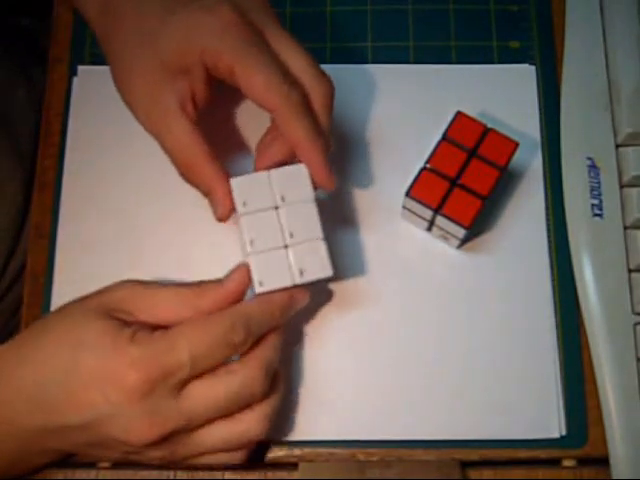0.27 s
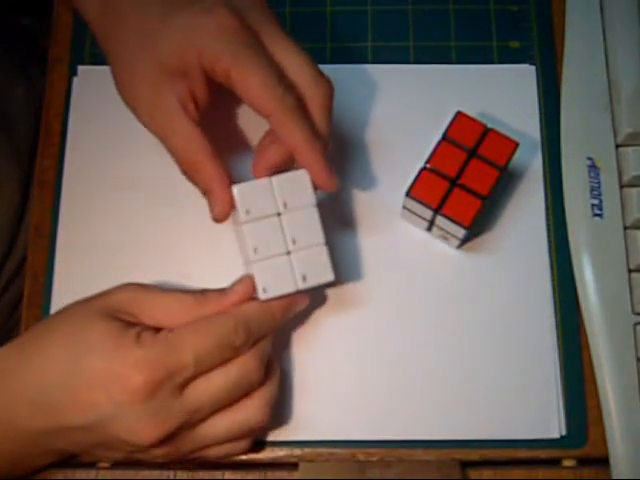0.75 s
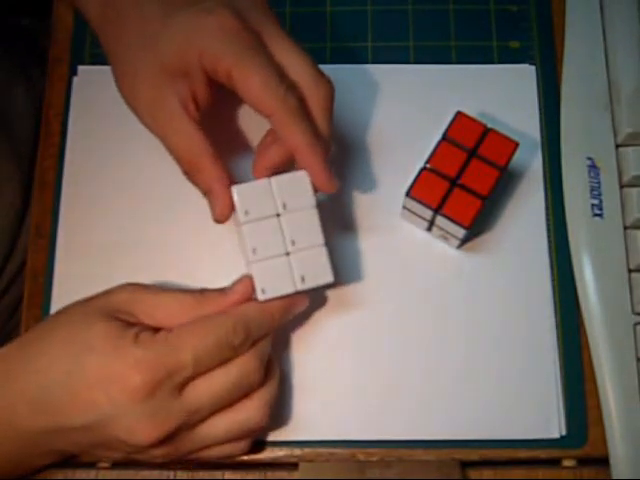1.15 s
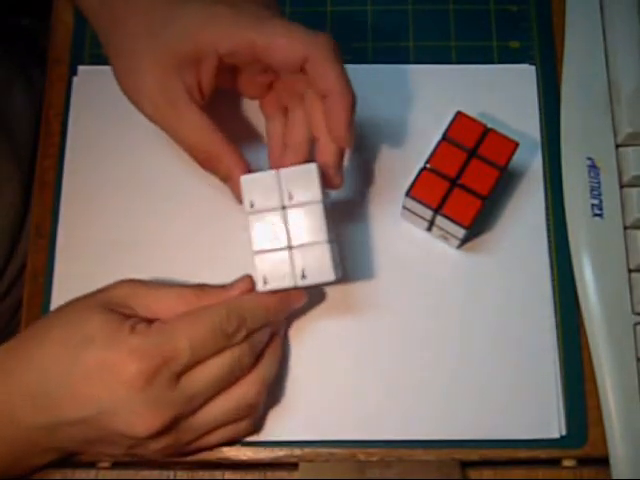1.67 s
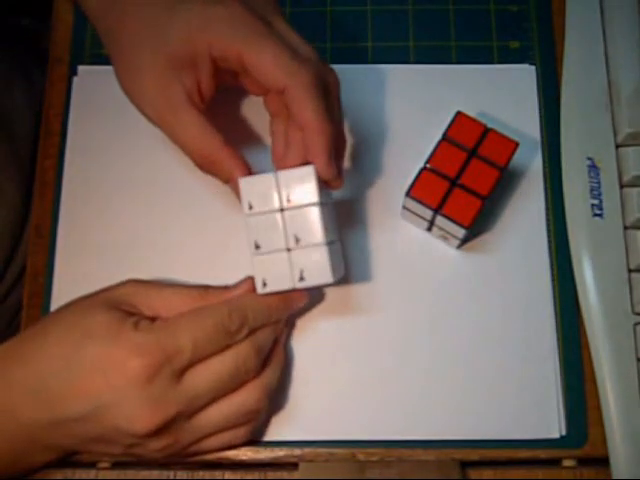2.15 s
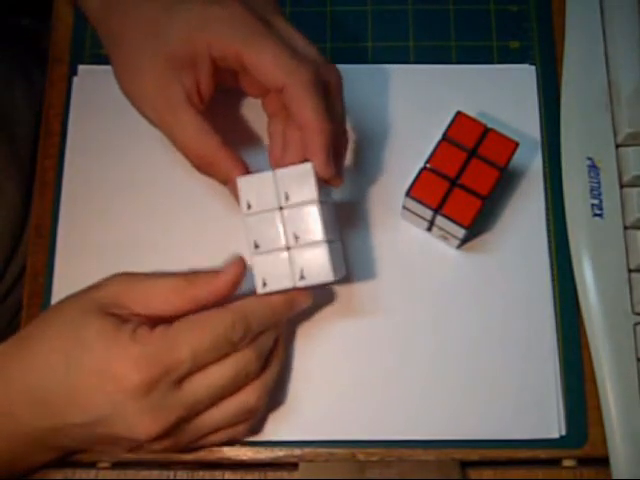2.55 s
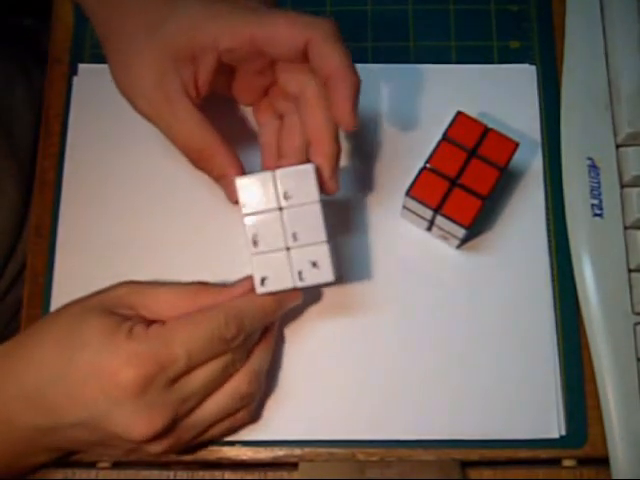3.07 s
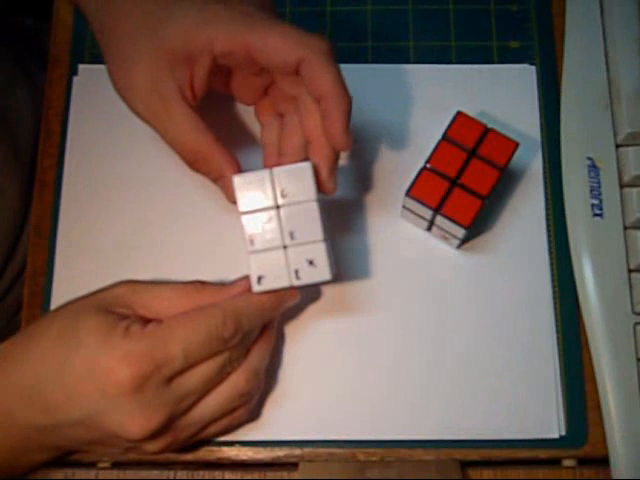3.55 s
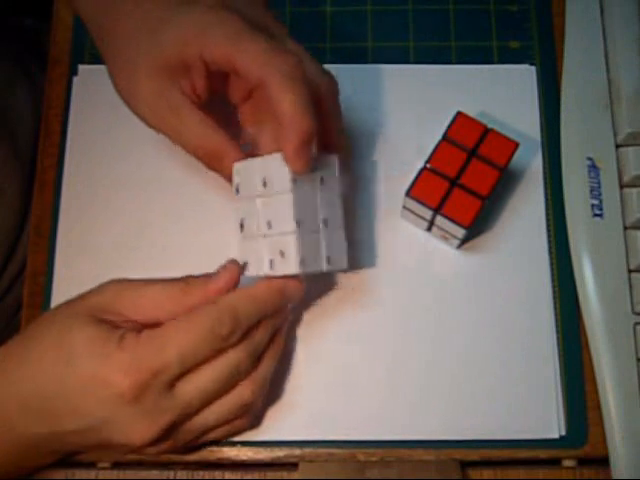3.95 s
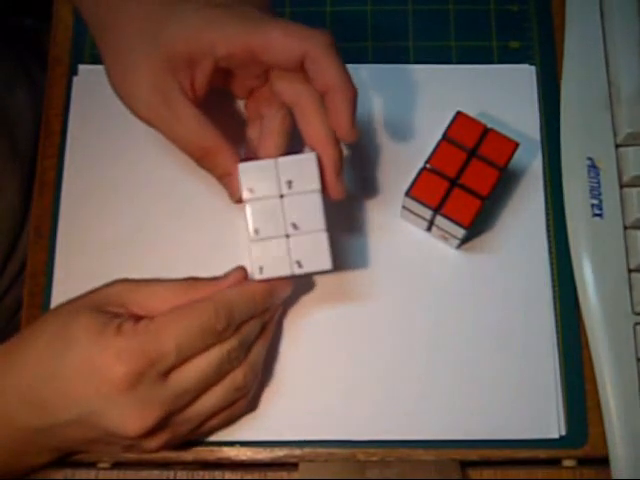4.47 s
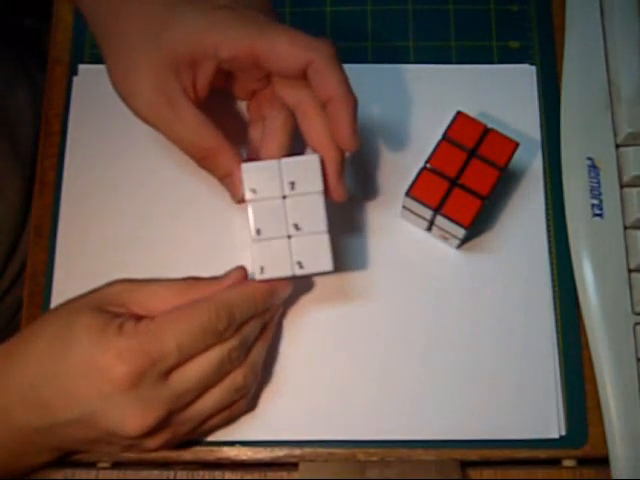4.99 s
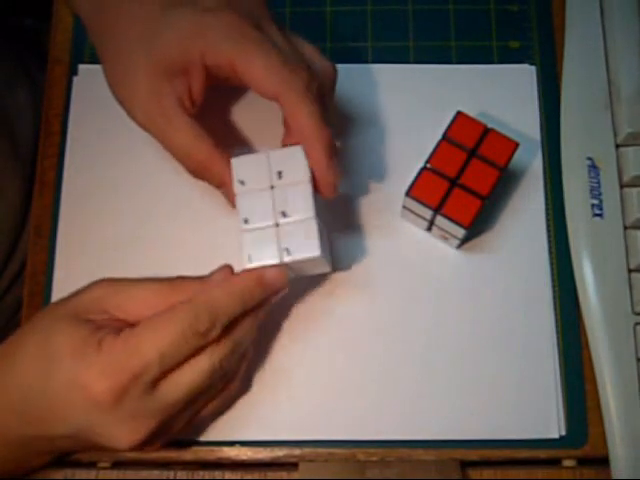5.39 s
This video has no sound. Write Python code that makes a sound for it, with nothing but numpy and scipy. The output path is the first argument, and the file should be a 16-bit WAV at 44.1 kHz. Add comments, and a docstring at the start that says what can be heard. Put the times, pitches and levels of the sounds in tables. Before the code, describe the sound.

In a small quiet room, a desk microphone picks up a continuous computer drone of midrange fan whine, deep hum and breathy airflow. Hands turn a small plastic puzzle: one crisp crackling click at about 1.2 seconds, a soft knock and brief dry rubbing, then a barely audible tap. Later turns are only faint slides, with subdued low desk rumble beneath. Light hiss persists to the end.

```python
"""From the start a computer drones: fan blade tones over mains and spindle hum, and noise shaped as air.
Near 1.2 s a plastic puzzle cube snaps and knocks, as filtered sums of decaying modes and noise bursts.
Soft slides of grainy noise follow, with one more knock near 1.8 s and fainter slides after 2.6 s.
Desk rumble swells near 2.7 s and 4.3 s as the hands shift their weight.
Throughout, a band-limited microphone adds hiss and faint thin tones."""
import sys
import numpy as np
from scipy import signal
from scipy.fft import rfft, irfft, next_fast_len
from scipy.io import wavfile
from scipy.ndimage import map_coordinates

SR = 44100
rng = np.random.default_rng(int(sys.argv[2]) if len(sys.argv) > 2 else 0)


def log_audio(samples):
    """Write samples as a 16-bit WAV file to the path given in sys.argv[1]."""
    # one column per channel
    frames = np.atleast_2d(samples).T
    # limit to full scale, then quantise
    limited = np.clip(frames, -1, 1)
    pcm = np.round(limited * 32767).astype(np.int16)
    wavfile.write(sys.argv[1], SR, pcm)


N = 248180  # samples

# contacts of the cube: [onset t/s, peak level/dB, centre of excited band f/Hz, bandwidth/octaves]
CONTACTS = [(1.1663, -27.5, 3800, .8), (1.1705, -24, 3850, .8), (1.1724, -24, 3900, .7),
            (1.1736, -22.5, 3850, .7), (1.1777, -16.5, 2500, 2.5), (1.1799, -20.5, 2600, 1.7),
            (1.2331, -24, 1250, .6), (1.2588, -34, 1500, .6), (1.7783, -34, 2100, .5)]
# modes of the plastic cube: [f/Hz, mean relative level/dB, 60 dB decay time t/s]
PLASTIC_MODES = [(1220, -8, 0.019), (1630, 2, .016), (2080, 6, 0.021), (2630, 7, 0.0053), (3030, -3, 0.011),
                 (3710, 1.5, 0.0075), (4190, -5.5, 0.0081), (4960, -14, 0.0088), (5770, -11, 0.0063),
                 (11400, 12, 0.0025)]
# sliding layers: [centre t/s, length t/s, level/dB]
SLIDES = [(1.247, 0.19, -46.5), (1.483, 0.23, -46), (2.65, 0.23, -61), (3.74, .16, -51)]
# spectrum of sliding plastic: [f/Hz, relative level/dB]
SCRAPE_SPECTRUM = [(500, -27), (1150, 1.5), (1330, -12), (1550, 4), (1950, -8), (2800, -6), (3050, -3.5),
                   (3900, -19), (4700, -14), (7000, -23), (15000, -50)]

# harmonics 1, 2, .. of the blade-pass rate: [steady level/dB, level of the fluttering part/dB]
BLADE_TONES = [(-32.5, -59), (-45.5, -55), (-51.5, -58.5), (-46, -60.5), (-60, -64), (-61.5, -76),
               (-73.5, -70), (-80, -79)]
# rotor unbalance at the shaft rate, its double and just above the blade tone: [shaft multiple, level/dB]
UNBALANCE = [(1, -57), (2, -60.5), (8, -57.5)]
BLADES = 7
BLADE_HZ, CREEP_HZ_PER_S = 522.55, 0.29  # blade-pass rate at the start, before unsteadiness; its drift
WANDER_HZ, JITTER_HZ = 0.18, 0.079  # slow and quick unsteadiness of the blade-pass rate

# mains and disk spindle hum, before the slow rise: [f/Hz, level/dB]
HUM = [(50, -40), (100, -59), (120.05, -39.5), (200, -57)]
HUM_START_DB, HUM_RISE_DB_PER_S = -1.3, 0.4
# air rushing through the case, before resonance and unsteadiness: [f/Hz, level/dB per Hz]
AIR_SPECTRUM = [(40, -64), (110, -68), (200, -70.5), (370, -76.5), (600, -72.5), (900, -76.5), (1400, -80),
                (2000, -79.5), (2300, -81), (3200, -84.5), (4000, -90.5), (4600, -90), (7000, -100.5),
                (12000, -115)]
# resonances of the case: [f/Hz, full width at half the dB lift f/Hz, lift level/dB]
CASE_RESONANCES = [(301, 31, 3), (449, 11, 6.5), (634, 42, 1.5), (730, 56, 5), (1010, 35, 10),
                   (1143, 66, 5), (1200, 22, 2), (1330, 40, 5.5), (1510, 57, 5), (1666, 19, 7.5),
                   (1800, 71, 4), (2005, 41, 4.5), (2476, 86, 3.5), (3470, 240, 1)]

# rumble of the desk, before its changes of level: [f/Hz, level/dB per Hz]
RUMBLE_SPECTRUM = [(3, -85), (8, -58), (13, -52), (19, -51.5), (28, -58.5), (40, -61), (60, -61.5),
                   (85, -71), (160, -85), (500, -120)]
# hands shifting their weight on the desk: [centre t/s, length t/s, level over the resting rumble/dB]
LEANS = [(2.68, 0.36, 8), (4.3, 0.15, 0)]
REST_DB, RESTLESS_DB = -0.7, 2.5  # gain of the rumble and the scale of its random swing

# microphone hiss: [f/Hz, level/dB per Hz]
HISS_SPECTRUM = [(1000, -100), (8000, -99.5), (11000, -99.2), (15500, -97)]
# thin steady tones of the electronics: [f/Hz, level/dB]
WHISTLES = [(4339, -76), (4859, -71), (5382, -76), (5907, -69), (6429, -76.5), (7278, -80), (7477, -81),
            (8323, -79), (8523, -77), (10007, -78), (10094, -79), (11577, -74.5), (12623, -74),
            (13905, -79), (14193, -78.5), (14955, -80), (15477, -72)]
TOP_HZ = 15750  # band limit of the microphone


def clicks():
    """Modal excitation: the band of each contact selects which damped modes of the cube ring."""
    out = np.zeros(N)
    t = np.arange(SR // 10) / SR
    for onset_s, peak_db, centre_hz, octaves in CONTACTS:
        ring = 0
        for hz, level_db, t60 in PLASTIC_MODES:
            mode_db = level_db + rng.normal(0, 3.0)
            ring = ring + amp(mode_db - 60 * t / t60) * np.sin(2 * np.pi * hz * t)
        crack = 0.47 * amp(-60 * t / 0.0069) * rng.standard_normal(len(t))

        half_band = 2 ** (octaves / 2)
        edges = [centre_hz / half_band, min(centre_hz * half_band, SR / 3)]
        band = signal.butter(2, edges, "bandpass", fs=SR, output="sos")
        hit = signal.sosfilt(band, ring + crack)
        out[round(onset_s * SR):][:len(t)] += amp(peak_db) * hit / np.abs(hit).max()
    return out


def slides():
    """Sliding friction: plastic faces rub with a fine random grain while a layer turns."""
    grain = rng.standard_normal(N) * amp(4.0 * wobble(220))
    scrape = filtered(grain, lambda hz: amp(along(SCRAPE_SPECTRUM, hz)))
    return swells(SLIDES) * unit(scrape)


def room(x, t60, wet_db):
    """Reverberation: a small room adds a short tail of exponentially decaying noise."""
    t = np.arange(SR // 3) / SR
    tail = rng.standard_normal(len(t)) * amp(-60 * t / t60)
    tail /= np.linalg.norm(tail)
    return x + amp(wet_db) * signal.fftconvolve(x, tail)[:N]


def fan():
    """Blade-pass radiation: tones lock to the shaft angle and uneven inflow makes each harmonic flutter."""
    t = np.arange(N) / SR
    unsteadiness = WANDER_HZ * wobble(1.99) + JITTER_HZ * wobble(14)
    blade_hz = BLADE_HZ + CREEP_HZ_PER_S * t + unsteadiness
    turns = np.cumsum(blade_hz) / BLADES / SR  # shaft angle in revolutions

    def spin(order):
        """Phase locking: a complex tone at a multiple of the shaft rate, its real part at rms 1."""
        return np.sqrt(2) * np.exp(2j * np.pi * (order * turns + rng.random()))

    whine = sum(amp(db) * spin(round(order)) for order, db in UNBALANCE)
    for k, (steady_db, flutter_db) in enumerate(BLADE_TONES, 1):
        gain = amp(steady_db) + amp(flutter_db) * flutter(width_hz=12.0)
        whine += gain * spin(k * BLADES)
    return whine.real


def hum():
    """Periodic excitation: mains and disk spindle drone as steady sines whose level rises slowly."""
    t = np.arange(N) / SR
    return tones(HUM) * amp(HUM_START_DB + HUM_RISE_DB_PER_S * t)


def air():
    """Flow noise and resonance: the fan's gently unsteady draught is coloured by the hollow case."""
    def density_db(hz):
        """Resonance: each peak of the case lifts the flow spectrum about its centre."""
        lift = sum(db / (1 + (2 * (hz - centre) / width) ** 2) for centre, width, db in CASE_RESONANCES)
        return along(AIR_SPECTRUM, hz) + lift

    return noise(density_db) * amp(0.33 + 0.25 * wobble(5.6))


def desk():
    """Structure-borne sound: deep rumble reaches the microphone stand and swells as the hands shift."""
    # the leans add in power to the resting rumble
    pressure = np.hypot(1, swells(LEANS)) * amp(REST_DB + RESTLESS_DB * wobble(3))
    return noise(lambda hz: along(RUMBLE_SPECTRUM, hz)) * pressure


def amp(db):
    """Logarithmic level: decibels to amplitude gain."""
    return 10 ** (np.asarray(db) / 20)


def unit(x):
    """Normalization: x at rms 1."""
    return x / np.sqrt(np.mean(np.abs(x) ** 2) + 1e-20)


def along(points, hz):
    """Interpolation: (f/Hz, value) points read on a logarithmic frequency axis."""
    f, v = np.transpose(points)
    return np.interp(np.log(hz + 0.0011), np.log(f), v)


def wobble(rate):
    """Slow random variation: a smooth curve through random knots, rate of them a second."""
    knots = rng.standard_normal(int(N * rate / SR) + 4)
    return map_coordinates(knots, [np.arange(N) * rate / SR])


def swells(rows):
    """Superposition: Gaussian rises and falls of gain from (t/s, length t/s, level/dB) rows."""
    t = np.arange(N) / SR
    return sum(amp(db) * np.exp(-(2 * (t - s) / length) ** 2) for s, length, db in rows)


def filtered(x, response):
    """Linear filtering: the spectrum of x times a response of frequency."""
    m = next_fast_len(N + SR // 2)
    return irfft(rfft(x, m) * response(np.fft.rfftfreq(m, 1 / SR)), m)[:N]


def noise(density_db):
    """Spectral density: random noise whose power per Hz follows a function of frequency."""
    white = rng.standard_normal(N)
    return filtered(white, lambda hz: amp(density_db(hz))) * np.sqrt(SR / 2)


def flutter(width_hz):
    """Random modulation: a complex gain of rms 1 spreads a tone into a narrow band."""
    shape = lambda hz: 1 / (1 + (hz / width_hz) ** 2) ** 0.75
    real, imag = (filtered(rng.standard_normal(N), shape) for _ in range(2))
    return unit(real + 1j * imag)


def tones(rows):
    """Superposition: steady sines of random phase from (f/Hz, rms level/dB) rows."""
    t = np.arange(N) / SR
    return np.sqrt(2) * sum(amp(db) * np.sin(2 * np.pi * (hz * t + rng.random())) for hz, db in rows)


def scene():
    """Superposition: the cube, with its room tail, adds to the computer's drone and the desk rumble."""
    cube = room(clicks() + slides(), t60=0.099, wet_db=-8.5)
    return (cube + fan() + hum() + air() + desk())[None]


def record(dry):
    """Transduction: the microphone adds hiss and thin tones and keeps nothing above its band limit."""
    electronics = noise(lambda hz: along(HISS_SPECTRUM, hz)) + tones(WHISTLES)
    return filtered(dry[0] + electronics, lambda hz: hz < TOP_HZ)[None]


dry = scene()
out = record(dry)
log_audio(out)
```